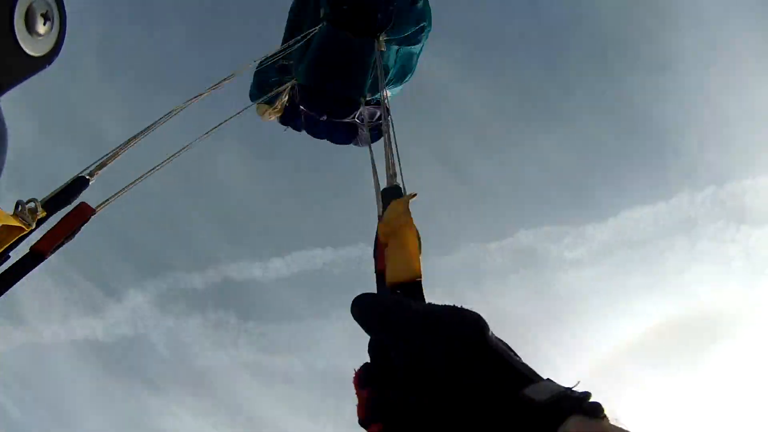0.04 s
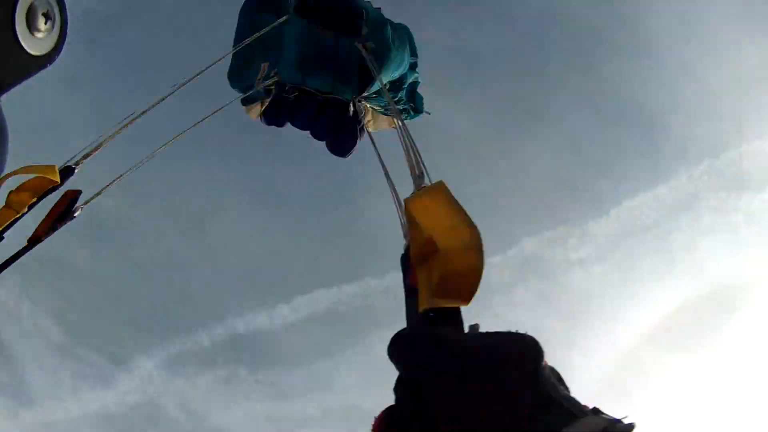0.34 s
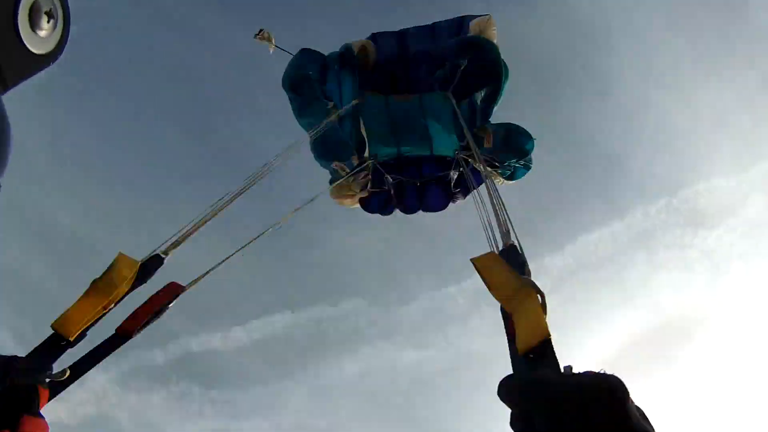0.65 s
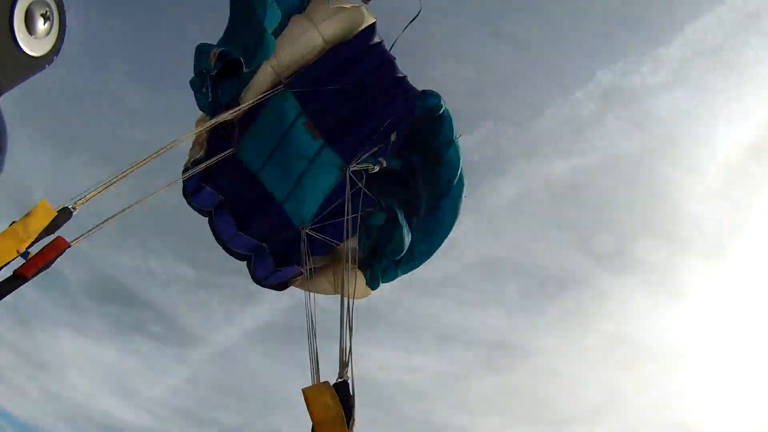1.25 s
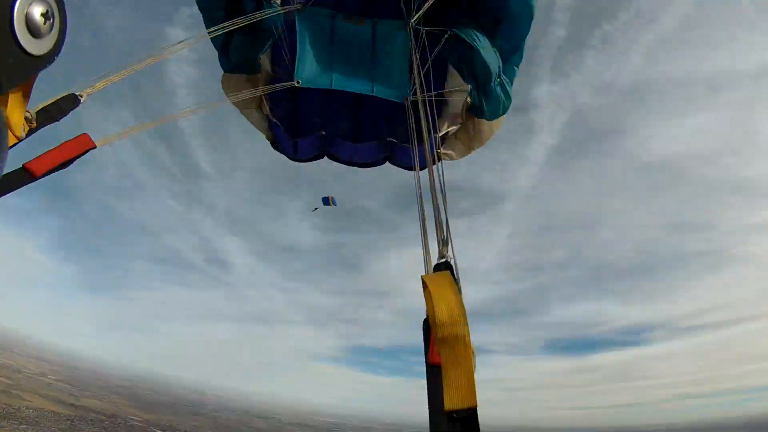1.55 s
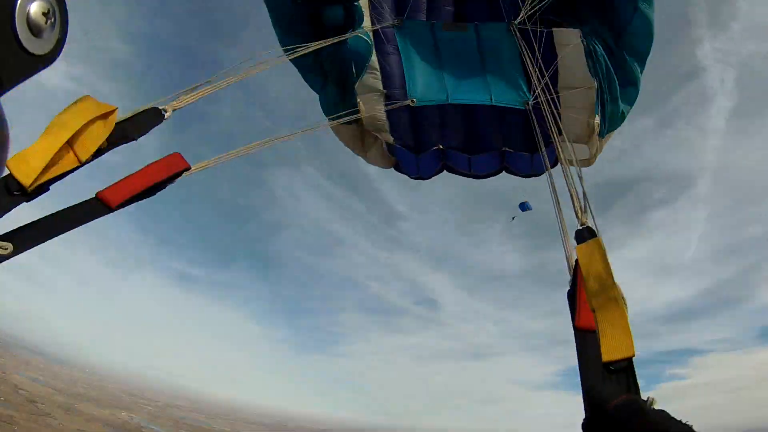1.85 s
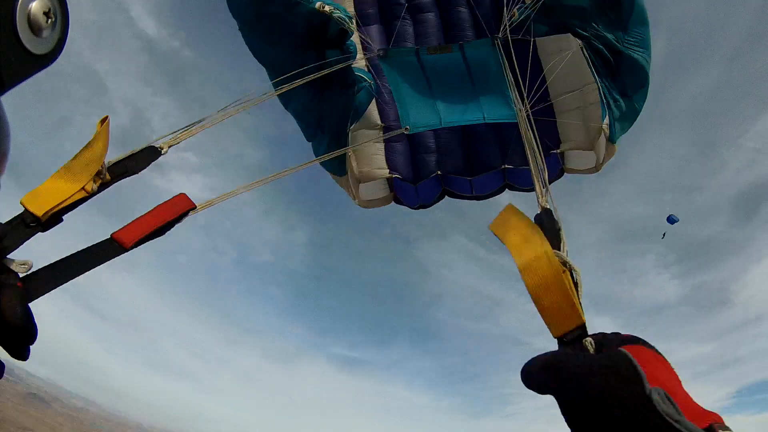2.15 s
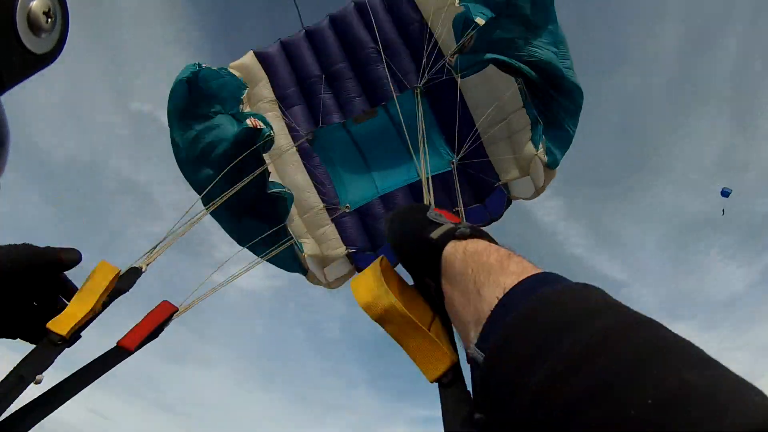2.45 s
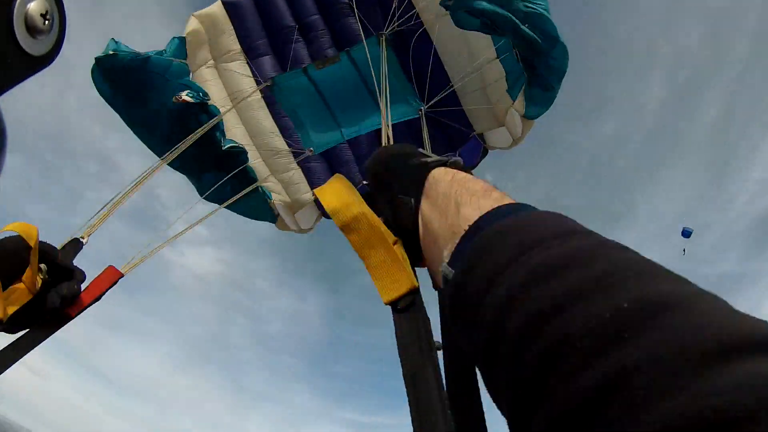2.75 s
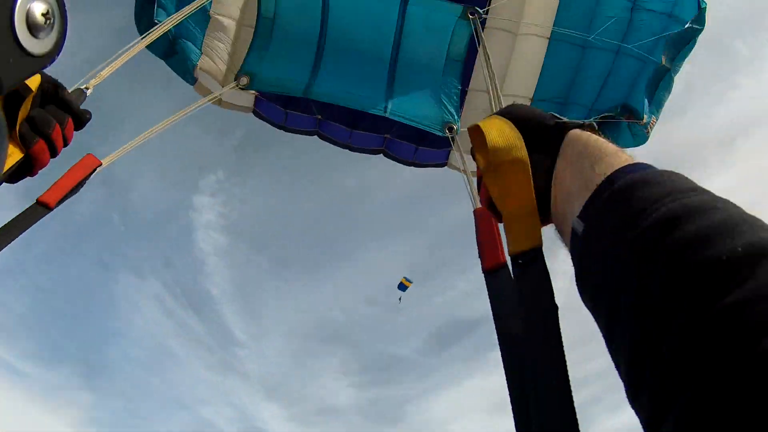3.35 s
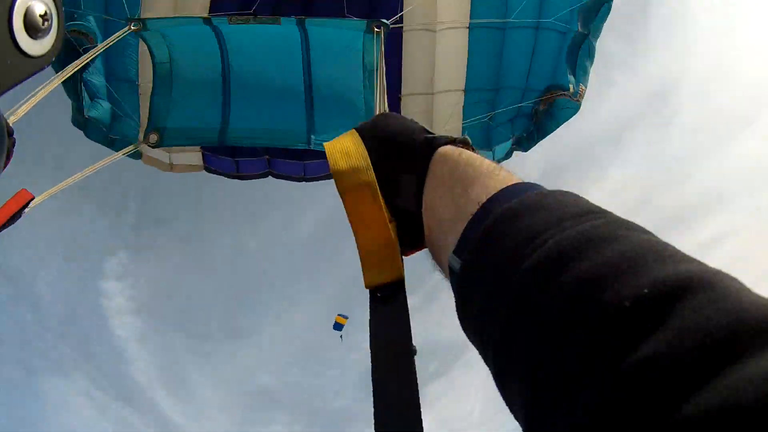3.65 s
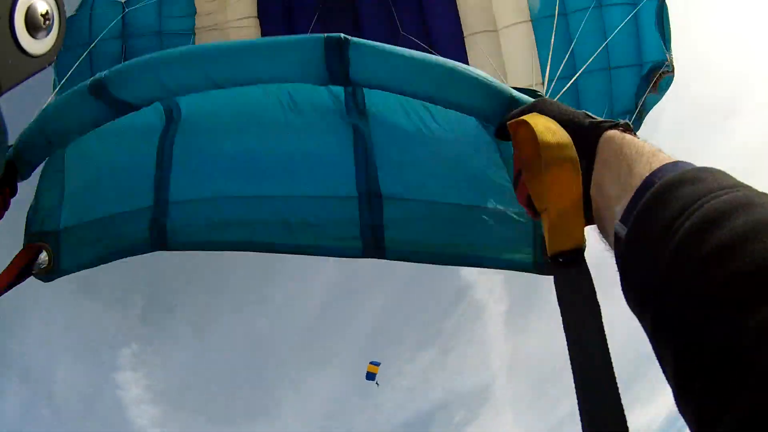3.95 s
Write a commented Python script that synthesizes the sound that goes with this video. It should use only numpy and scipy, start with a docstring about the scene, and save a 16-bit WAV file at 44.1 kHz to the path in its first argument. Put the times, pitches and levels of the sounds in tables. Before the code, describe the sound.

Heavy, gusting wind on the microphone, with parachute cloth flapping in bursts above.

```python
"""Wind under an opening parachute

In open air below the canopy, wind tearing straight at a camera microphone. Slow heavy buffets, faster
eddies and a ragged rush press on the capsule; overhead the cloth flaps in bursts and the rigging ticks.
After a short lull the air hits harder and brighter. The biggest buffets pin the capsule at its limit:
the sound chokes for a few milliseconds and returns with a tick."""
import sys
import numpy as np
from scipy import signal
from scipy.fft import rfft, irfft
from scipy.io import wavfile
from scipy.ndimage import uniform_filter1d, minimum_filter1d, map_coordinates

SR = 44100
rng = np.random.default_rng(int(sys.argv[2]) if len(sys.argv) > 2 else 0)


def dump_mix(stems):
    """Bounce the given channels to the path in sys.argv[1] as a 16-bit WAV at rate SR."""
    frames = np.atleast_2d(stems).T  # one column per channel
    limited = np.clip(frames, -1, 1)  # hard clip at full scale
    pcm = np.round(limited * 32767).astype(np.int16)
    wavfile.write(sys.argv[1], SR, pcm)


N = 176400

# air pressure at the capsule: time_s, buffet_db, eddy_db, rush_db, hiss_db
AIR_LEVELS = [(0,-5.5,-16,-31,-61), (0.452,-2.5,-16.5,-31.5,-60), (0.901,-5.5,-16,-31,-53),
              (1.201,-3.5,-17,-29,-51), (1.332,-4.5,-12,-34,-47.5), (1.522,-5.5,-11,-30.5,-56),
              (1.749,-2.5,-15,-32.5,-60), (1.93,-8.5,-10,-27,-55), (2.25,-7.5,-12,-22,-48),
              (2.378,-6,-15,-33,-52.5), (2.521,-17,-25,-31,-48.5), (2.68,-17,-24,-33,-48),
              (2.708,-10.5,-12.5,-25,-58), (2.8,-6.5,-9,-19,-44), (3.002,-13,-8.5,-19,-45),
              (3.2,-10.5,-5,-14.5,-38), (3.29,-7.5,-8,-19,-44.5), (3.479,-13,-8,-16,-39),
              (3.579,-15,-8,-18,-47), (3.719,-12.5,-8,-17,-45.5), (4.0,-10,-9,-15,-41)]
# spectra of the wind's four layers, low to high: frequency_hz, relative_db
BUFFET_SPECTRUM = [(10, -19), (20, -2.5), (28, 2), (40, 0.5), (58, -3.5), (85, -13), (160, -39.5)]
EDDY_SPECTRUM = [(40, -18), (70, 2.5), (115, -1), (180, -5.5), (270, -13), (420, -24.5), (800, -39)]
RUSH_SPECTRUM = [(130, 0), (250, 1), (380, 0.5), (550, -3.5), (950, -9), (1750, -13), (2300, -21.5),
                 (3200, -30.5), (4500, -38.5), (6500, -30), (12000, -62)]
HISS_SPECTRUM = [(2000, -3), (3300, -8), (5300, -17.5), (5950, -6), (6450, 5.5), (7200, -5), (7900, -5),
                 (9000, -15), (11000, -11), (13200, -13), (15500, -28)]
# spectra of the recorder's overload ticks and the fizz under them: frequency_hz, relative_db
OVERLOAD_TICK_SPECTRUM = [(2000, -8), (3000, -4), (3950, 6), (5200, -9), (7000, -6), (8200, -3.5),
                          (10000, -10.5), (12400, -8), (15500, -14)]
FIZZ_SPECTRUM = [(2000, -3), (4000, 3), (6000, -6.5), (9000, -21.5), (13000, -7), (16000, -10)]
# spectra of the cloth's rustle, a flap's thump and a rigging tick: frequency_hz, relative_db
RUSTLE_SPECTRUM = [(120, 6), (300, 5.5), (900, -3.5), (1700, 3), (3000, -11), (5000, -29.5), (7500, -19),
                   (9000, -25), (11000, -20), (13200, -28.5), (15500, -30)]
THUMP_SPECTRUM = [(60, 5), (130, 4.5), (220, -7), (380, -11.5), (700, -33)]
RIGGING_SPECTRUM = [(1500, 1), (3800, -7), (5000, -13), (6700, 0), (9000, -12.5), (13000, -10),
                    (16000, -18)]
# canopy flaps: snap_s, crack_db, thump_db, rise_s
CANOPY_FLAPS = [(.01,-20,-13.5,.025), (0.079,-21.5,-18,0.005), (0.159,-20.5,-10,0.012),
                (0.253,-22.5,-13,0.028), (.33,-14.5,-4,0.0084), (.426,-28,-5.5,0.0041),
                (.473,-21,-13,0.0057), (0.558,-23,-13.5,0.0067), (0.593,-21,-1.5,0.018),
                (0.613,-19.5,-16,0.026), (0.664,-29,-16,0.0041), (0.683,-21,-10,0.0071),
                (.736,-17.5,-10.5,0.0066), (0.746,-19.5,-15,0.004), (0.798,-21.5,-8,0.0076),
                (.829,-18,-20,0.007), (1.037,-22.5,-17,0.016), (1.08,-18.5,-16.5,0.0078),
                (1.115,-19,-14,0.018), (1.205,-30,-14,0.0049), (1.27,-20.5,-17,0.023),
                (1.316,-14,-4,0.0035), (1.33,-17,-6.5,0.039), (1.354,-17,-1.5,0.014),
                (1.406,-15.5,-16,0.013), (1.507,-18.5,-1,0.011), (1.554,-23,-2,0.005), (1.692,-22,-9,0.012),
                (1.729,-18.5,-18,0.0054), (1.779,-18,-16,0.0054), (1.842,-20.5,-20,0.017),
                (1.896,-20.5,-10,0.0096), (1.94,-18.5,-6,0.021), (1.993,-24,-12,0.0039),
                (2.032,-22,-19,0.0082), (2.182,-22,-13,0.016), (2.349,-20,-9,.007),
                (2.759,-14.5,-12,0.0046), (3.07,-12.5,-19,0.011), (3.125,-20,-17,0.011)]
# rigging ticks and scrapes: peak_s, level_db, rise_s, decay_s
RIGGING_TICKS = [(0.192, -27.5, .001, 0.0016), (0.93, -41, 0.0056, 0.015), (0.9486, -25, .001, 0.0015),
                 (1.099, -32.5, 0.014, 0.0086), (1.188, -31, 0.014, 0.004), (1.3245, -31, .001, 0.012),
                 (2.6176, -28.5, 0.0011, 0.0035), (2.858, -32.5, .004, 0.0076),
                 (3.942, -29, 0.00083, 0.0024), (3.9666, -27.5, .001, 0.0024)]

EDDY_SPEEDUP = .35  # dB of eddy frequency per dB of eddy level
SWIRL_DB, FLUTTER_DB = 1.9, 1.3  # how far the rush moves with the buffets and by chance
FLAP_SHELTER = 5.7  # how strongly a flap pushes the slow buffet aside
SUCTION, SUCTION_S, SUCTION_LAG_S = 0.51, .005, 0.0025  # pull of air that follows each flap
OVERLOAD_TICK_AT = .3  # a buffet falling back through this size sets off a tick
CAPSULE_LIMIT, STICK_AT = 1.027, 1.08  # pressures where the capsule tops out and sticks
LOW_CUT_HZ, TOP_CUT_HZ = 183.5, 15400  # the camera's wind filter and upper limit


def undb(db):
    """Decibels to gain."""
    return 10 ** (np.asarray(db) / 20)


def noise(spectrum):
    """Noise of unit rms with the given spectrum, falling steeply beyond its ends."""
    hz, db = np.array(spectrum, float).T
    log_f = np.log(np.maximum(np.arange(N // 2 + 1) * SR / N, 1))
    outside = np.maximum(np.log(hz[0]) - log_f, 0) + np.maximum(log_f - np.log(hz[-1]), 0)
    gain = undb(np.interp(log_f, np.log(hz), db)) * np.exp(-2 * outside)
    y = irfft(rfft(rng.standard_normal(N)) * gain, N)
    return y / y.std()


def drift(rate_hz):
    """Smooth random motion of unit spread, changing about rate_hz times a second."""
    f = np.arange(N // 2 + 1) * SR / N
    y = irfft(rfft(rng.standard_normal(N)) * np.exp(-(f / rate_hz) ** 2), N)
    return y / y.std()


def steady(x, span_s):
    """The same motion with its rms held near one over the span."""
    size = max(int(span_s * SR), 2)
    return x / np.sqrt(uniform_filter1d(uniform_filter1d(x ** 2, size), size) + 1e-9)


def eddies(strength):
    """Eddies pass the microphone, quicker and so higher in stronger air."""
    speed = (strength / strength.mean()) ** EDDY_SPEEDUP
    passing = map_coordinates(noise(EDDY_SPECTRUM), [np.cumsum(speed)], mode="wrap")
    return strength * steady(passing, 0.059)


def spurts(per_second=200, rise_s=0.0018):
    """Random spurts of air that build up and break off; zero mean, unit spread."""
    kicks = (rng.random(N) < per_second / SR) * (.5 + rng.random(N))
    swells = signal.lfilter([1], [1, -np.exp(-1 / (rise_s * SR))], kicks)[::-1]
    swells = uniform_filter1d(uniform_filter1d(swells, size=14), size=9)
    return (swells - swells.mean()) / swells.std()


def overload_ticks(buffets, strength, decay_s=0.00064, tick_db=-30, fizz_db=-51.5):
    """The overloaded recorder gives a short buzzy tick as each big swing falls back, over fine fizz."""
    beyond = np.abs(buffets) > OVERLOAD_TICK_AT
    falls_back = np.roll(beyond, 1) & ~beyond
    kicks = falls_back * undb(2 * rng.standard_normal(N))
    bursts = signal.lfilter([1], [1, -np.exp(-1 / (decay_s * SR))], kicks)
    ticks = undb(tick_db) * uniform_filter1d(bursts, size=44) * noise(OVERLOAD_TICK_SPECTRUM)
    fizz = undb(fizz_db) * strength * noise(FIZZ_SPECTRUM) * undb(0.84 * drift(98))
    return ticks + fizz


def wind(t, cracks, suction):
    """Buffets and eddies right on the capsule; the rush and hiss riding on them come in ragged spurts."""
    time_s, *levels_db = np.array(AIR_LEVELS, float).T
    buffet_gain, eddy_gain, rush_gain, hiss_gain = (undb(np.interp(t, time_s, db)) for db in levels_db)
    slow_swing = steady(noise(BUFFET_SPECTRUM), 0.14)
    sheltered = buffet_gain * slow_swing / (1 + FLAP_SHELTER * cracks)
    buffets = sheltered * (1 - np.minimum(suction, 1)) - SUCTION * suction
    swirls = eddies(eddy_gain)
    ragged = spurts()
    waver_db = FLUTTER_DB * drift(28) + SWIRL_DB * np.tanh(-slow_swing)
    ticks = overload_ticks(buffets, buffet_gain)
    rush = rush_gain * steady(noise(RUSH_SPECTRUM), 0.013) * (1 + 0.41 * ragged)
    hiss = hiss_gain * noise(HISS_SPECTRUM) * (1 + 0.42 * ragged)
    return buffets + ticks + swirls * undb(1.05 * waver_db) + (rush + hiss) * undb(waver_db)


def cloth_rustle(level_db=-40.5):
    """Air rustles steadily through the cloth and lines."""
    return undb(level_db + 0.5 * drift(34)) * noise(RUSTLE_SPECTRUM)


def flap_envelopes(t, end_s=0.0013):
    """Strength of crack, thump and suction: each flap builds up, snaps, then pulls air after it."""
    cracks = thumps = suction = 0
    for snap_s, crack_db, thump_db, rise_s in CANOPY_FLAPS:
        shape = np.exp(-((t - snap_s) / np.where(t < snap_s, rise_s, end_s)) ** 2)
        cracks += undb(crack_db) * shape
        thumps += undb(thump_db) * shape
        suction += np.exp(-((t - snap_s - SUCTION_LAG_S) / SUCTION_S) ** 2)
    return cracks, thumps, suction


def canopy_flaps(cracks, thumps):
    """Each flap of the cloth overhead is a burst of rush over a thump of air."""
    return cracks * steady(noise(RUSH_SPECTRUM), 0.021) + thumps * steady(noise(THUMP_SPECTRUM), 0.045)


def rigging(t):
    """Small bright ticks and scrapes of lines and buckles."""
    strikes = 0
    for peak_s, level_db, rise_s, decay_s in RIGGING_TICKS:
        strikes += undb(level_db) * np.exp(-np.abs(t - peak_s) / np.where(t < peak_s, rise_s, decay_s))
    return strikes * noise(RIGGING_SPECTRUM)


def overload(x, limit, hardness=12):
    """Swings near the limit are rounded off by a gain that moves smoothly."""
    gain = (1 + np.abs(x / limit) ** (2 * hardness)) ** (-.5 / hardness)
    gain = minimum_filter1d(gain, size=15)
    for size in (19, 13, 9):
        gain = uniform_filter1d(gain, size)
    return x * gain


def capsule_swing(pressure, stick_s=0.0049):
    """The capsule rounds off big swings and sticks at its limit under a sustained push."""
    pinned = np.abs(uniform_filter1d(pressure, int(stick_s * SR))) > STICK_AT
    held = uniform_filter1d(uniform_filter1d(pinned * 1., size=40), size=25)
    return (1 - held) * overload(pressure, CAPSULE_LIMIT) + held * np.sign(pressure) * CAPSULE_LIMIT


def scene():
    """Wind, cloth and rigging at the microphone, below the canopy."""
    t = np.arange(N) / SR
    cracks, thumps, suction = flap_envelopes(t)
    return (wind(t, cracks, suction) + cloth_rustle() + canopy_flaps(cracks, thumps) + rigging(t))[None]


def record(dry):
    """The camera's mono microphone: capsule, wind filter, overload, then the top cut."""
    wind_filter = signal.butter(1, LOW_CUT_HZ, "high", fs=SR)
    top_cut = signal.ellip(8, .2, 70, TOP_CUT_HZ, fs=SR, output="sos")
    thinned = signal.lfilter(*wind_filter, capsule_swing(dry[0]))
    return signal.sosfilt(top_cut, overload(thinned, limit=1))[None]


dry = scene()
out = record(dry)
dump_mix(out)
```